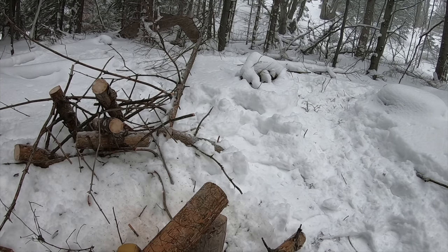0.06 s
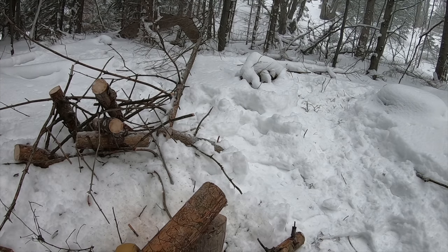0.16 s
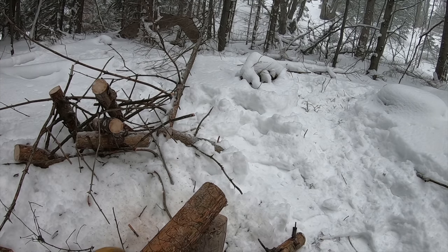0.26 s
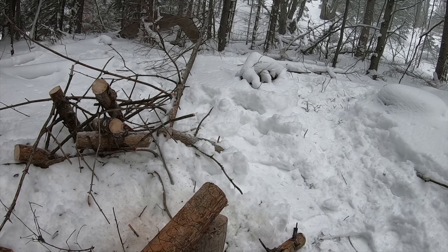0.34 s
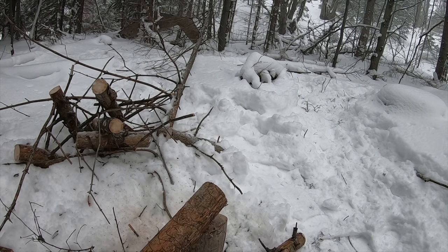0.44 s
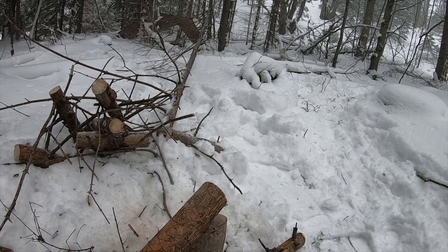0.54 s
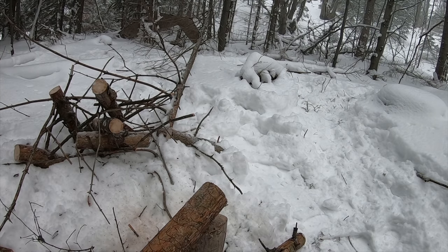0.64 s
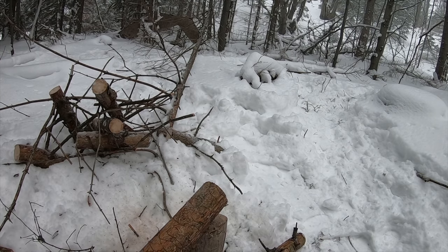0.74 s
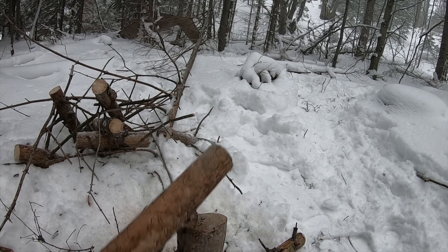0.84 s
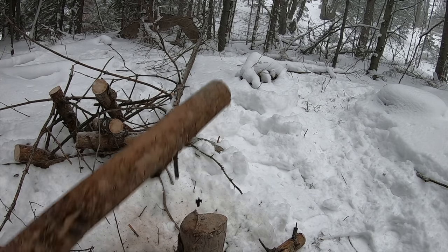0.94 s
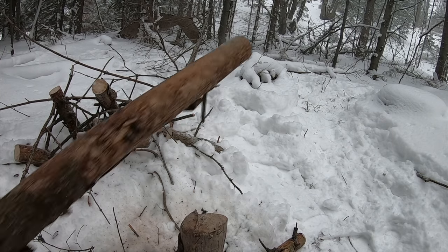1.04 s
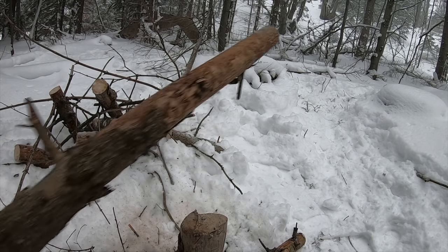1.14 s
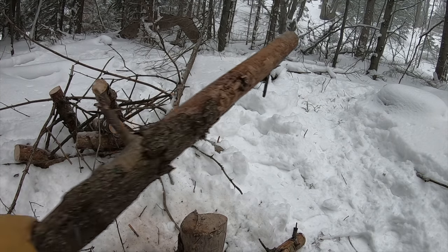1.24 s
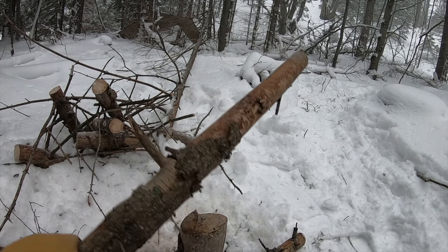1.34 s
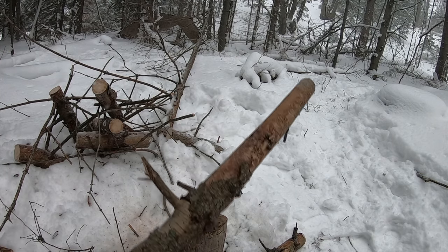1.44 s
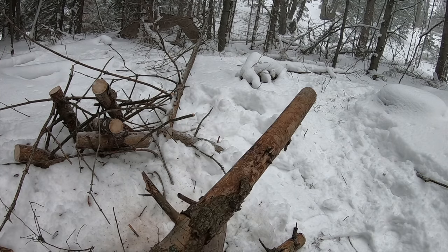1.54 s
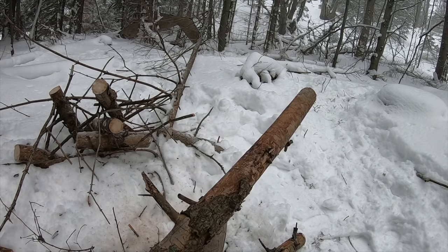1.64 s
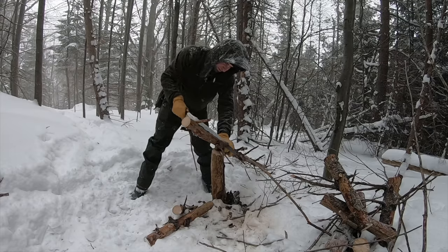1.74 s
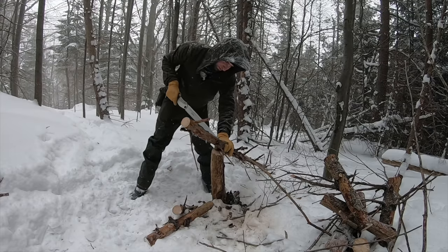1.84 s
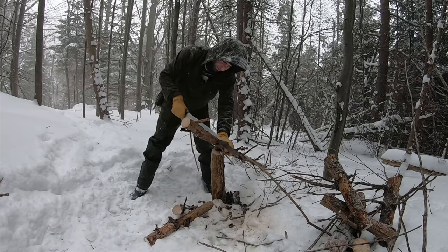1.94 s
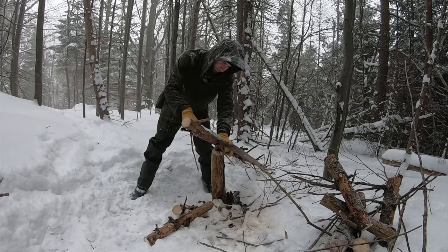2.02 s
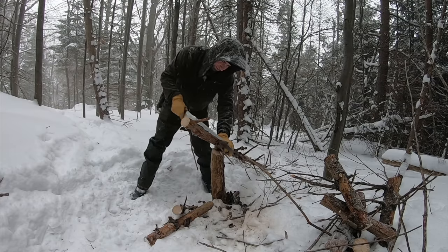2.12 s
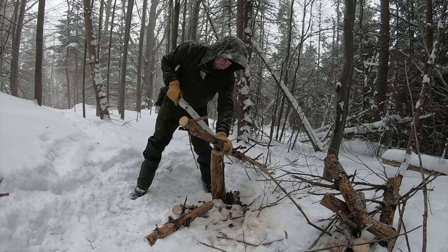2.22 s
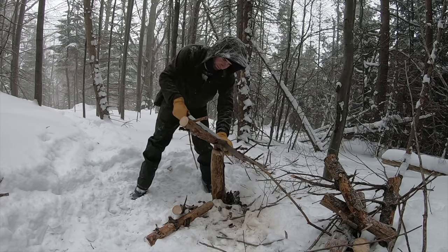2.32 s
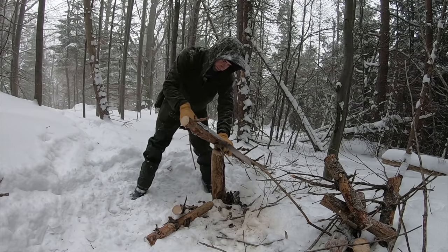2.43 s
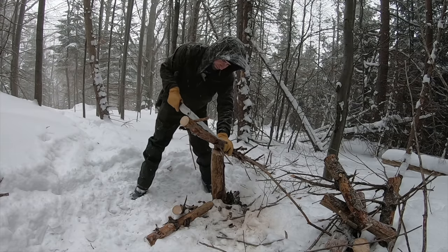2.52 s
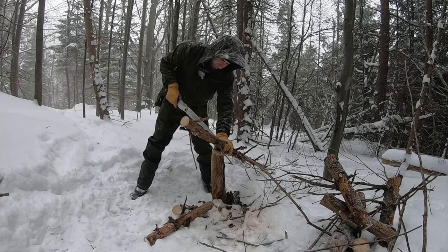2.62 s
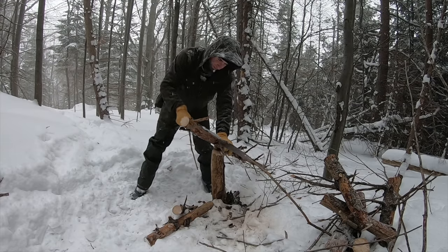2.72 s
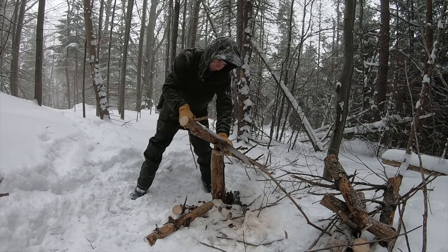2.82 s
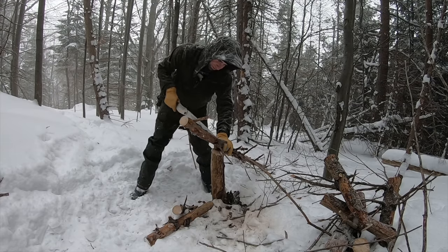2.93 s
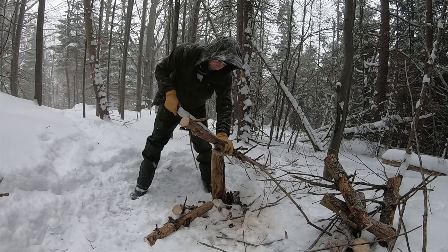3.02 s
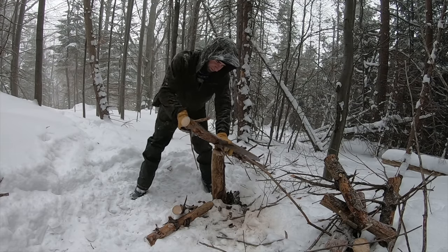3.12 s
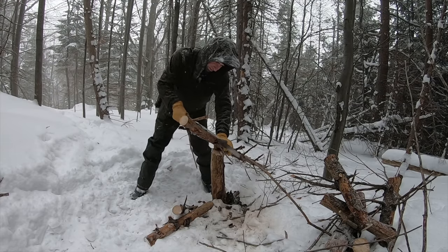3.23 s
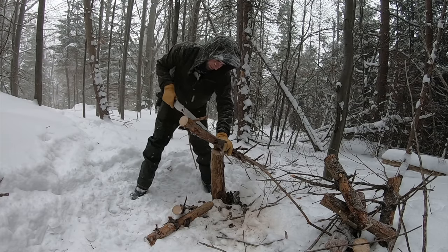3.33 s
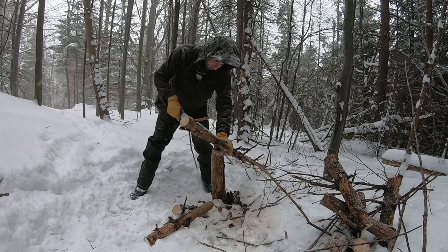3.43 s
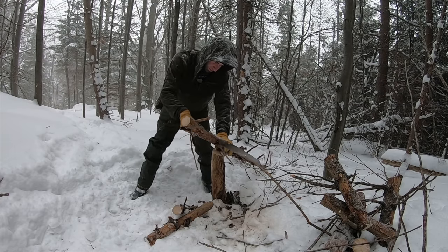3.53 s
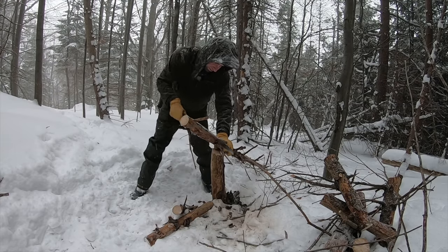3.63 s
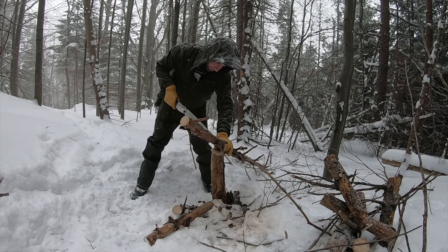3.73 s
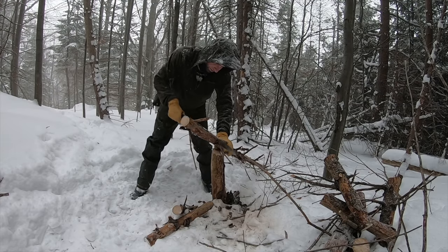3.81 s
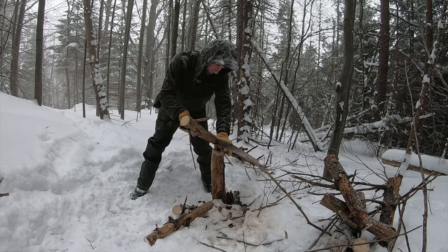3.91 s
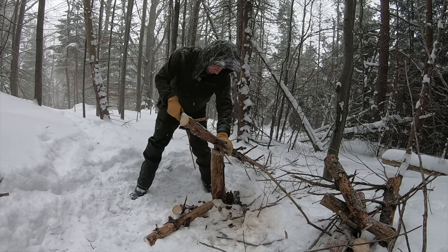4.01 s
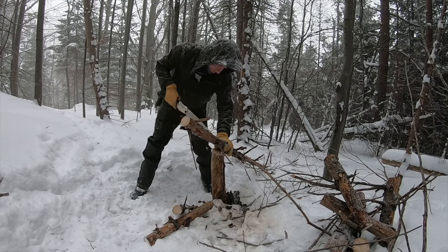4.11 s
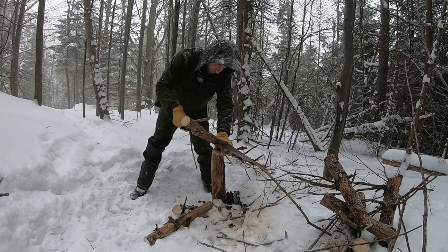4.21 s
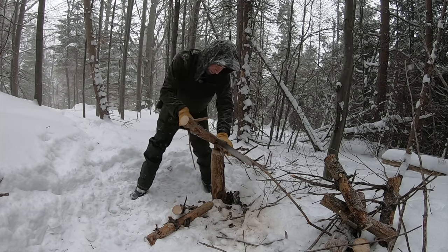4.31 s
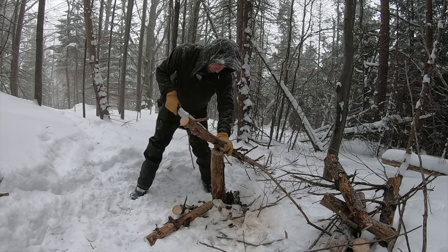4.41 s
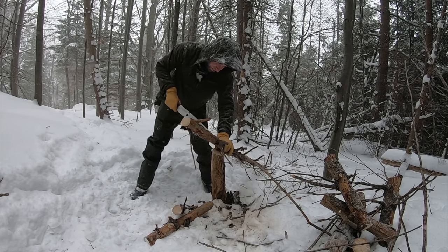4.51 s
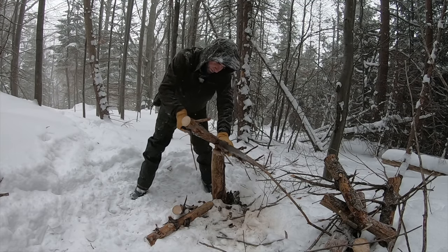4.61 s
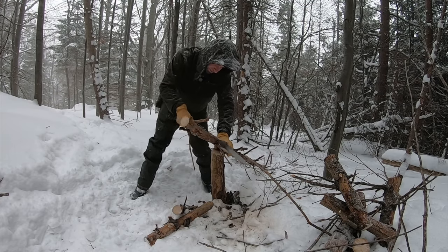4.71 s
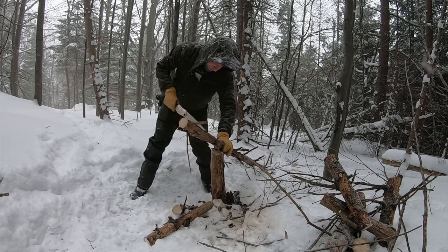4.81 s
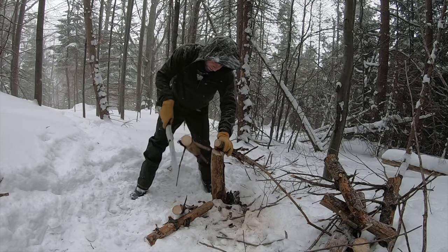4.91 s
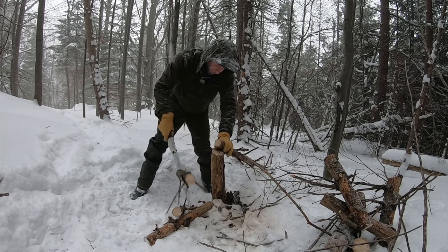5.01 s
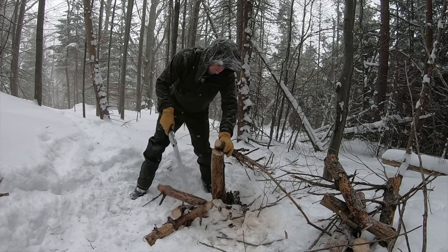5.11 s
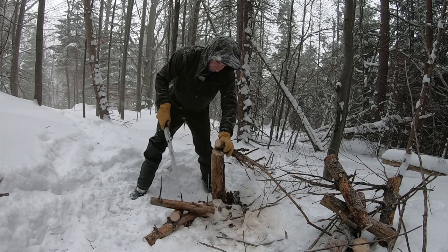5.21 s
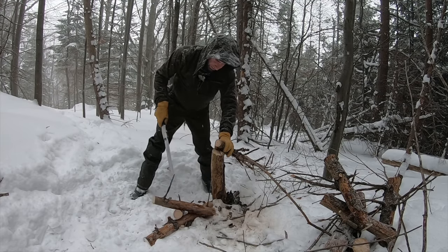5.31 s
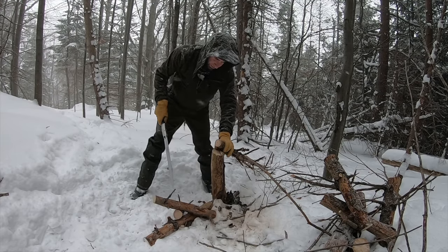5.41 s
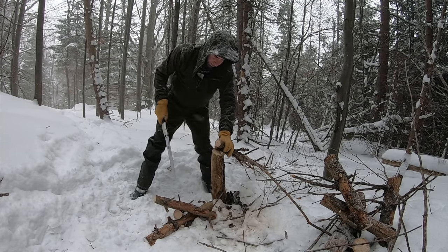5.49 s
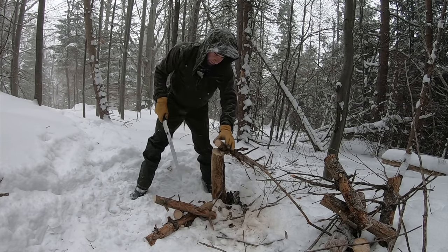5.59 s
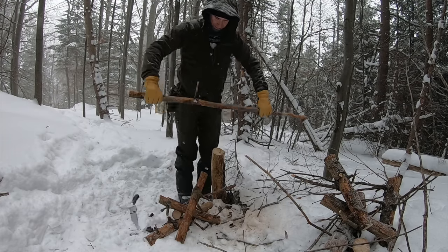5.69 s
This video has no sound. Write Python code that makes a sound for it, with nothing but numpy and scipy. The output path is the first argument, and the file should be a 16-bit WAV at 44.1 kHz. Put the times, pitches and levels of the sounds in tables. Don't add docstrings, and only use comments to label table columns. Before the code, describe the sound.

Muffled mount bumps and bark scrapes come first, with crisp twig snaps and a few hollow wood knocks as a branch is set down. Seventeen quick, regular saw strokes follow, bright and raspy over a woody body. The cut ends, steel rings faintly, and the offcut knocks onto the pile, leaving faint, nearly dry outdoor quiet. Close stereo pickup.

```python
import sys
import numpy as np
from scipy import signal
from scipy.fft import rfft, irfft, next_fast_len
from scipy.io import wavfile
from scipy.ndimage import uniform_filter1d, map_coordinates

SR = 44100
rng = np.random.default_rng(int(sys.argv[2]) if len(sys.argv) > 2 else 0)


def digitize_waveform(pressure):
    field = np.atleast_2d(pressure).T
    bounded = np.clip(field, -1, 1)
    quanta = np.round(bounded * 32767).astype(np.int16)
    wavfile.write(sys.argv[1], SR, quanta)


def convert_level_to_amplitude(level_db):
    exponent = np.asarray(level_db, float) / 20
    return 10 ** exponent


N = 253574
LIFT_S = 4.918

# f/Hz, density/dB per Hz
AIR_COLOUR = [(18, -13), (30, -24), (85, -26), (247, -4.5), (683, -5), (999, 5.5), (1660, -2), (7430, -16),
              (13000, -51)]
# f/Hz, t60/s
TRUNK_DECAY = [(200, 0.29), (2000, 0.11), (10000, 0.14)]
# f/Hz, left louder by/dB, left lag/rad, likeness/0-1
PORT_DIFFERENCE = [(60, -4, 0, .5), (220, 0, 0, .9), (800, 4, .7, .9), (1400, -1, .2, .92),
                   (2400, 0, 0, .985), (3900, 0, 0, 1), (5000, 9, -.1, .85), (6100, 12, .2, .65),
                   (7000, 7, 1, .72), (7900, 11, 1.2, .45), (8300, 2, 2.5, .6), (9500, -5, 1.5, .65),
                   (10500, -1, 0, .75), (12000, 0, 0, .62), (15000, -1, 0, .5)]

# crest t/s, level/dB, f/Hz, build-up per 20 dB/s
STAND_HUMS = [(1.59, -29, 106, .03), (1.76, -35, 111.2, 0.12), (1.915, -37, 106, .2), (2.03, -42, 113, .1),
              (2.16, -37, 114, 0.12), (2.295, -37.5, 110.3, 0.17), (2.45, -41, 116.1, .12),
              (2.6, -42, 112, .08), (2.675, -37, 108, 0.08), (2.85, -41, 118, 0.1), (2.96, -38, 104, .06),
              (3.05, -37.5, 108, 0.15), (3.24, -39, 114, .1), (3.35, -38, 100, .06),
              (3.42, -29.5, 102.9, 0.06), (3.63, -39, 115, .2), (3.73, -39, 100, .06),
              (3.795, -31, 105, 0.07), (3.965, -35, 115, 0.15), (4.04, -37, 115, .1), (4.13, -33, 102, .08),
              (4.19, -35, 96, .1), (4.335, -32.5, 114, 0.14), (4.41, -37, 113, 0.2),
              (4.555, -30, 103.9, .09), (4.74, -32.5, 112, 0.16), (4.885, -32.5, 108, 0.13),
              (4.95, -39, 114, .1), (5.19, -47, 114.2, 0), (5.316, -39, 113, 0.1)]
# crest t/s, rise per 20 dB/s, fall per 20 dB/s, deep level/dB, upper level/dB
HANDLING = [(.04, .03, .14, -54, -59), (.21, .02, 0.22, -55, -51), (.43, .2, .15, -57, -41.5),
            (.53, .06, .07, -58, -47.5), (.95, .6, .8, -78, -70.5), (1.08, .03, .1, -54, -69),
            (1.24, .02, .08, -60.5, -68), (1.57, .04, 0.23, -46.5, -68), (1.8, 0.081, 0.15, -53.5, -67),
            (2.88, .04, .08, -54.5, -62), (5.17, .03, .1, -57, -75), (5.33, .06, .09, -59, -68)]
# t/s, peak level/dB, f/Hz, click above it/dB
MOUNT_BUMPS = [(.024, -29.5, 109, -19), (.201, -22, 140, -14), (.254, -30.5, 178, -27),
               (.286, -24, 134.4, -24), (.321, -31.5, 178, -25), (.364, -28.5, 147.5, -27),
               (.415, -23, 138, -32), (.499, -30.5, 123, -17), (.913, -47, 189, 11), (1.06, -39, 283, -23),
               (1.074, -31.5, 131.6, -28), (1.227, -39, 80, 3), (1.539, -27.5, 170, -13),
               (1.557, -30.5, 128, -16)]

# crest t/s, rise per 20 dB/s, fall per 20 dB/s, level/dB
SLEEVE_SWEEPS = [
    (.45, .2, .3, -62),
    (1.25, .3, .12, -73),
]
# f/Hz, density/dB per Hz
SLEEVE_COLOUR = [(3000, -120), (4500, -12), (7000, -2), (9500, 0), (12800, -9), (14000, -30), (15500, -50)]
# crest t/s, rise per 20 dB/s, fall per 20 dB/s, hiss level/dB, low level/dB
DRAGS = [
    (.05, 0.12, .3, -72, -82),
    (.44, 0.2, 0.28, -50, -62),
    (.72, .04, 0.19, -66, -70),
    (.908, .13, 0.047, -46.5, -67),
    (1.01, .006, 0.13, -53, -53),
    (1.178, .3, 0.32, -54.5, -64),
    (1.53, 0.029, .15, -57.5, -72),
    (4.92, .02, .15, -52, -68.5),
    (5.144, 0.051, 0.099, -51, -59),
    (5.26, 0.021, 0.16, -52, -52),
]
# centre t/s, length/s, hiss level/dB, low level/dB
SOFT_SCUFFS = [(0.704, 0.046, -45.5, -55), (0.841, 0.019, -54, -62), (0.885, 0.06, -48, -58),
               (0.925, 0.05, -43, -48), (1.534, .025, -48, -60), (1.309, 0.1, -58, -66),
               (1.549, 0.066, -52, -43), (5.092, 0.031, -44, -52), (5.117, 0.045, -35.5, -45),
               (5.36, 0.04, -53.5, -63), (5.638, 0.075, -62.5, -62.5), (5.74, .07, -66, -83.5)]
# f/Hz, density/dB per Hz
CLOTH_COLOUR = [(590, -18), (1000, -6), (1720, -4.5), (2680, -3.5), (3040, -3), (3360, -3.5), (5050, -5.5),
                (6130, -9), (9320, -16), (15000, -50)]
# f/Hz, density/dB per Hz
BARK_COLOUR = [(50, -35), (130, -6.5), (550, -13.5), (817, -15.5), (906, -19.5), (1800, -26.5),
               (2340, -13.5), (3960, -120)]

# t/s, peak level/dB, f/Hz, crack above it/dB
WOOD_KNOCKS = [(.02, -45.5, 595, 9.5), (.197, -53, 861, -27), (.281, -50, 4200, -10),
               (.646, -43, 3500, -15), (.696, -34, 855, -15), (1.004, -33, 3000, 0),
               (1.058, -29.5, 495, -33.5), (1.175, -36, 1600, -10), (1.295, -40, 875, 15),
               (1.394, -58, 2380, -11), (1.551, -32, 1100, -38)]
# t/s, peak level/dB, f/Hz, crack above it/dB
TWIG_TICKS = [(.2485, -42, 4800, 0), (.2503, -31, 1100, -5), (.868, -27, 7700, 5), (.877, -29, 5000, 0),
              (.885, -34, 2100, 5), (.891, -33, 4300, 8), (.902, -36, 5000, 5), (.9086, -22, 5100, 5),
              (.915, -20, 4200, 8), (.926, -29, 1900, 9), (.930, -28, 1800, 9), (.9345, -19, 5000, -5),
              (.941, -27, 5000, -5), (.9595, -44, 6000, 8), (1.009, -38, 7000, 5), (1.027, -40, 2400, 5),
              (1.2305, -36, 900, 5), (1.311, -42, 2400, 8), (1.522, -36, 3800, 5), (1.528, -33, 3000, 8),
              (1.535, -29, 3900, 8), (5.282, -34, 5400, 0), (5.296, -36, 4000, 3), (5.352, -42, 5400, 3),
              (5.264, -34, 3200, 0)]
# f/Hz, level/dB, t60/s
BUTT_MODES = [(533, -6, .03), (834, 0, .022), (1150, 0, .02), (1600, -8, .015), (2385, -9, .02),
              (3122, -8, .02), (4710, -16, .015)]
# t/s, level/dB
BUTT_STRIKES = [
    (1.004, -21),
    (1.011, -30),
    (1.037, -33),
    (1.044, -39),
    (1.552, -31),
]
# f/Hz, level/dB, t60/s
STUB_MODES = [(1007, -12, .04), (1450, -6, .03), (1766, 0, .03), (2900, -16, .015), (3951, -18, .014)]
# t/s, level/dB
STUB_STRIKES = [
    (1.165, -44),
    (1.1755, -28),
    (1.181, -36),
]
# t/s, peak level/dB, f/Hz
TOOTH_CATCHES = [(1.6701, -53, 4780), (1.6886, -34, 4870), (1.709, -31, 2870), (1.7898, -21, 2760),
                 (1.9969, -21, 4400), (2.1455, -25, 3010), (2.3446, -29, 3300), (2.358, -24, 2970),
                 (2.5167, -26, 4650), (2.7152, -30, 2920), (2.7332, -23, 2860), (2.8993, -25, 6520),
                 (3.1033, -26, 4390), (3.2834, -23, 2710), (3.488, -25, 4460), (3.6536, -26, 3020),
                 (3.6745, -21, 2900), (3.8591, -28, 4600), (4.0342, -16, 4750), (4.0776, -16, 2870),
                 (4.2283, -29, 4270), (4.2418, -24, 2890), (4.3984, -26, 2850), (4.5915, -27, 2860),
                 (4.778, -25, 3360)]
# t/s, peak level/dB, f/Hz, crack above it/dB
FIBRE_SNAPS = [
    (2.06, -18, 3660, -5),
    (2.25, -19, 2960, -5),
    (2.435, -19.5, 3260, -7.5),
    (2.22, -22, 4500, 0),
    (2.18, -25, 3500, 0),
    (3.755, -20, 4470, 4),
    (4.046, -19, 4750, 0),
    (4.76, -32, 2880, 11.5),
    (4.888, -28, 4650, -10),
]
# f/Hz, level/dB, t60/s
STEEL_MODES = [(1238, -6, .15), (4420, -9, .18), (4947, 0, .24)]
# t/s, level/dB
BLADE_STRIKES = [
    (4.915, -54),
    (5.108, -33),
    (5.151, -47),
]
# f/Hz, level/dB, t60/s
OFFCUT_MODES = [(907, -8, .07), (1003, 0, .06), (1215, -10, .09), (2035, -23, .07), (2315, -26, .06),
                (2530, -24, .06), (2988, -6, .028), (3208, -23, .07), (3962, -17, .04), (4500, -14, .025),
                (4953, -25, .05), (7031, -27, .03)]
# t/s, level/dB
OFFCUT_LANDING = [
    (5.2441, -16),
    (5.283, -40),
]
# t/s, peak level/dB, f/Hz, crack above it/dB
OFFCUT_TUMBLE = [(5.085, -30, 3770, -10), (5.107, -23, 3820, -14.5), (5.118, -31, 5040, -16),
                 (5.15, -24, 929, 0), (5.282, -40, 2000, 0), (5.296, -39, 1000, 0), (5.346, -42, 3305, -14),
                 (5.43, -49.5, 927, -10), (5.46, -56, 970, 11), (5.499, -66, 810, 13),
                 (5.682, -59, 890, -23)]

# centre t/s, f/Hz, length/s, level/dB
TOOTH_SQUEALS = [(2.047, 1750, 0.096, -40.5), (2.97, 2950, 0.034, -36.5), (3.17, 5750, 0.02, -30),
                 (3.185, 1747, 0.046, -33), (3.727, 2900, 0.013, -25), (4.32, 642, 0.071, -40),
                 (4.298, 6750, 0.04, -33), (4.48, 2950, 0.022, -33.5), (4.665, 3750, 0.013, -31.5),
                 (4.835, 2906, 0.03, -23.5), (4.84, 1220, 0.066, -35)]
# start t/s, rasp level/dB, crest place/0-1, fall power
SAW_STROKES = [(1.7, -41, 0.3, 2.4), (1.762, -27.5, .45, 2.1), (1.948, -29.5, 0.67, 2.1),
               (2.126, -27, 0.61, 3.5), (2.321, -30.5, 0.6, 2.6), (2.498, -27.5, 0.56, 3.05),
               (2.699, -29.5, .65, 2.4), (2.876, -26.5, .54, 3), (3.078, -31, 0.58, 1.9),
               (3.252, -26.5, .58, 3.2), (3.447, -31, .66, 2.06), (3.628, -27, .66, 4.6),
               (3.827, -33, 0.64, 1.8), (4.003, -28, 0.49, 1.74), (4.193, -33, 0.55, 1.4),
               (4.376, -28.5, 0.5, 1.7), (4.574, -34, 0.55, 1.6), (4.753, -29.5, 0.54, 0.57)]
# centre t/s, level/dB
DEEP_BITES = [(1.828, 2), (1.853, 2), (2.065, 4), (2.19, 2), (2.259, 3), (2.436, 4), (2.572, 2), (2.605, 2),
              (2.813, 3), (2.972, 2), (3.172, 2), (3.343, 2), (3.376, 3), (3.517, 2), (3.556, 2),
              (3.727, 2), (3.756, 3), (3.943, 2), (4.081, 3), (4.12, 2), (4.292, 2), (4.49, 2), (4.679, 2),
              (4.835, 4), (4.891, 2)]
# f/Hz, density/dB per Hz
RASP_COLOUR = [(880, -26.5), (1500, -8.5), (1770, -20), (1970, -17), (2890, -1.5), (3280, -3.5),
               (4360, -3.5), (6510, -4), (8400, -15), (9630, -13), (11400, -26.5), (14100, -31),
               (15600, -43)]
# f/Hz, density/dB per Hz
WOOD_COLOUR = [(94, -31.5), (160, 3), (222, -4), (434, -8), (630, -2.5), (760, -5.5), (1240, -1),
               (1960, -4.5), (2400, -7), (3120, -17), (5280, -120)]
# f/Hz, width/Hz, level/dB, growth/dB per s
BLADE_MODES = [(2280, 200, 2, 0), (2890, 170, -2.5, 2.5), (3500, 78, -9, 0), (4400, 100, -3, 0),
               (4720, 96, -8, 1), (5700, 64, -7, 0), (6720, 50, -8, 2), (9400, 200, -8, 0)]
# f/Hz, width/Hz, level/dB, growth/dB per s
FREE_BLADE_MODES = [(1230, 14, -9, 0), (2880, 12, -8, 0), (4430, 12, -9, 0), (4950, 10, -4, 0)]
# f/Hz, width/Hz, level/dB, growth/dB per s
BRANCH_MODES = [(633, 50, -3, 2), (1000, 30, -9, 0), (1220, 90, -6, 1), (1490, 50, -5, 1),
                (1740, 70, -6, -1.5)]


def unit(x):
    return x / np.sqrt(np.mean(x ** 2) + 1e-20)


def along(points, hz):
    f, *columns = np.transpose(points)
    return np.squeeze([np.interp(np.log(hz + 1), np.log(f + 1), column) for column in columns])


def coloured(x, points):
    return filtered(x, lambda f: convert_level_to_amplitude(along(points, f)))


def filtered(x, response):
    m = next_fast_len(N + SR // 2)
    return irfft(rfft(x, m) * response(np.fft.rfftfreq(m, 1 / SR)), m)[..., :N]


def wobble(rate):
    knots = rng.standard_normal(int(N * rate / SR) + 400)
    return map_coordinates(knots, [np.arange(N) * rate / SR])


def patches(shape, rows, frames):
    field = uniform_filter1d(rng.standard_normal(shape), size=rows, axis=0)
    return unit(uniform_filter1d(field, size=frames, axis=1))


def grains(spike_db, patchy_db, drift_db=-2.0):
    size_db = spike_db * np.minimum(rng.exponential(size=N), 5)
    z = signal.stft(rng.standard_normal(N) * convert_level_to_amplitude(size_db), nperseg=256)[2]
    field = patchy_db * patches(z.shape, 3, 3) + drift_db * patches(z.shape, 2, 30)
    return unit(signal.istft(z * convert_level_to_amplitude(field), nperseg=256)[1][:N])


def add(out, s, sound):
    out[round(s * SR):][:len(sound)] += sound[:N - round(s * SR)]


def swell(centre, length):
    out = np.zeros(N)
    u = np.arange(round(length * SR)) / (length * SR)
    add(out, centre - length / 2, np.sin(np.pi * u) ** 2)
    return out


def humps(rows):
    s, rise, fall = np.transpose(rows)[:3, :, None]
    late = np.arange(N) / SR - s
    fallen = np.where(late < 0, -late / rise, late / fall)
    return uniform_filter1d(convert_level_to_amplitude(-20 * fallen), size=300, axis=1)


def ring(t, hz, t60, attack):
    return np.sin(2 * np.pi * hz * t) * convert_level_to_amplitude(-60 * t / t60) * (1 - np.exp(-t / attack))


def resonances(modes, f):
    return 1 + sum(convert_level_to_amplitude(db) * 1j * f * w / (c * c - f * f + 1j * f * w) for c, w, db, _ in modes)


def singing(drive, modes, colour):
    t, knots = np.arange(N) / SR, rng.standard_normal((len(modes), 200))
    hz, w, db, grows = np.transpose(modes)[:, :, None]
    # 3 dB, 10 knots per second
    wander = np.array([np.interp(t * 10, np.arange(200), row) for row in knots])
    gain = convert_level_to_amplitude(db + grows * (t - t.mean()) + 3 * wander)
    rings = filtered(gain * drive, lambda f: 1j * f * w / (hz * hz - f * f + 1j * f * w)).sum(axis=0)
    return coloured(drive + rings, colour)


def stroke_motion():
    t, start = np.arange(N) / SR, np.array([row[0] for row in SAW_STROKES])
    k = np.clip(np.searchsorted(start, t) - 1, 0, len(start) - 1)
    _, rasp_db, crest, fall_power = np.array(SAW_STROKES)[k].T
    end = np.append(start[1:], LIFT_S)
    u = np.clip((t - start[k]) / (end[k] - start[k]), 0, 1)
    speed = np.sin(np.pi / 2 * np.where(u < crest, u / crest, (1 - u) / (1 - crest)))
    rise_power = np.where(k % 2, 1.69, 1.47)
    power = np.where(u < crest, rise_power, fall_power)
    wood_db = -39 + 0.83 * (start[k] - start[0]) + 0.47 * (rasp_db - np.median(rasp_db)) - rasp_db
    return speed, power, rasp_db, wood_db


def forest():
    noise = rng.standard_normal((2, N))
    air = filtered(noise, lambda f: convert_level_to_amplitude(along(AIR_COLOUR, f)) * f ** 2 / (f ** 2 + 130 ** 2))
    return convert_level_to_amplitude(-67 + 0.5 * wobble(4.38)) * unit(air)


def trees(x):
    hz, t, z = signal.stft(rng.standard_normal(SR // 2), SR, nperseg=256)
    decay = convert_level_to_amplitude(-60 * t / along(TRUNK_DECAY, hz)[:, None])
    tail = signal.istft(z * decay, SR, nperseg=256)[1]
    return signal.fftconvolve(x, tail / np.linalg.norm(tail))[:N]


def ports(x):
    z = signal.stft(x, nperseg=128)[2]
    random_phase = np.exp(2j * np.pi * rng.random(z.shape))
    other = signal.istft(z * random_phase, nperseg=128)[1][:N]
    other = other * np.std(x) / np.std(other)

    def gains(f):
        db, lag, alike = along(PORT_DIFFERENCE, f)
        right = convert_level_to_amplitude(-db) * np.exp(1j * lag)
        shared = alike * right
        own = np.sqrt(abs(1 - alike ** 2)) * right
        return np.array([np.ones_like(f), shared, own]) * 2 / np.hypot(abs(1 + shared), abs(own))

    left, right, _ = filtered(x, gains)
    return np.array([left, right + filtered(other, gains)[2]])


def bumps():
    out, t = np.zeros(N), np.arange(SR // 2) / SR
    for s, db, hz, click_db in MOUNT_BUMPS:
        falling_hz = hz * (1 + 0.67 * np.exp(-t / 0.0035))
        thud = ring(t, falling_hz, t60=0.14, attack=0.0014)
        click = ring(t, 840, t60=0.0085, attack=0.0014)
        add(out, s, convert_level_to_amplitude(db + 4.5) * (thud + convert_level_to_amplitude(click_db) * click))
    left = filtered(out, lambda f: 1j * f / (260 + 1j * f))
    return np.array([left, 1.85 * out])


def stand_hum():
    crest_gain = np.array([convert_level_to_amplitude(db) for _, db, _, _ in STAND_HUMS])[:, None]
    swells = crest_gain * humps([(s, rise, 0.0944) for s, _, _, rise in STAND_HUMS])
    level = swells.max(axis=0)
    hum_hz = uniform_filter1d(np.array(STAND_HUMS)[swells.argmax(axis=0), 2], size=2000)
    phase = 2 * np.pi * np.cumsum(hum_hz + 6 * wobble(25)) / SR
    port_phase = np.array([0.74 + 2.56 * wobble(9), 0 * level])
    hum = level * convert_level_to_amplitude(4.3 + 1.8 * wobble(20)) * np.sin(phase + port_phase)
    return hum * convert_level_to_amplitude([[-7], [4]])


def handling():
    jolts, (deep_db, upper_db) = humps(HANDLING), np.transpose(HANDLING)[3:]
    sawing = uniform_filter1d((stroke_motion()[0] > 0) * 1., size=4000)
    deep_gain = convert_level_to_amplitude(deep_db) @ jolts + convert_level_to_amplitude(-66) * sawing + convert_level_to_amplitude(-97)
    upper_gain = convert_level_to_amplitude(upper_db) @ jolts + convert_level_to_amplitude(-63.5) * sawing + convert_level_to_amplitude(-74)
    noise = rng.standard_normal((4, N))
    deep_noise = noise[0] + 0.42 * noise[:2]
    deep = unit(filtered(deep_noise, lambda f: (f / 55) ** 3.23 / (1 + (f / 70) ** 6)))
    upper = unit(filtered(noise[2:], lambda f: (f / 200) ** 3 / (1 + (f / 260) ** 6)))
    deep = deep_gain * convert_level_to_amplitude(10.5 + 3.2 * wobble(14)) * deep
    return deep + upper_gain * convert_level_to_amplitude(2.5 + 6.1 * wobble(30)) * upper


def sleeve():
    hiss = unit(coloured(grains(spike_db=0.5, patchy_db=2.0), SLEEVE_COLOUR))
    return convert_level_to_amplitude(np.transpose(SLEEVE_SWEEPS)[3]) @ humps(SLEEVE_SWEEPS) * hiss


def rustle():
    drags, (hiss_db, low_db) = humps(DRAGS), np.transpose(DRAGS)[3:]
    clumps = convert_level_to_amplitude(1.5 * wobble(90))
    hiss = unit(coloured(grains(spike_db=3.5, patchy_db=2.0), CLOTH_COLOUR))
    low = unit(coloured(grains(spike_db=5.5, patchy_db=2.0), BARK_COLOUR))
    scuff_hiss = sum(convert_level_to_amplitude(db) * swell(s, length) for s, length, db, _ in SOFT_SCUFFS)
    scuff_low = sum(convert_level_to_amplitude(db) * swell(s, length) for s, length, _, db in SOFT_SCUFFS)
    hiss_gain = convert_level_to_amplitude(-80) + convert_level_to_amplitude(hiss_db - 0.5) @ drags + scuff_hiss
    low_gain = convert_level_to_amplitude(-78.5) + convert_level_to_amplitude(low_db + 6.5) @ drags + scuff_low
    return clumps * (hiss_gain * hiss + low_gain * low)


def contact(hz, crack_db, t60):
    t = np.arange(SR // 4) / SR
    burst = rng.standard_normal((2, len(t))) * convert_level_to_amplitude(-60 * t / t60) * (1 - np.exp(-t / 0.00027))
    burst[:, 4] += 4
    body = 0
    for ratio, gain in [(0.5, 0.48), (1, 1), (2.1, 0.14)]:
        body = body + gain * signal.lfilter(*signal.iirpeak(ratio * hz, 4.5, SR), burst[0])
    body = signal.lfilter(*signal.butter(3, min(3.7 * hz, 7500), fs=SR), body)
    crack = signal.lfilter(*signal.butter(4, [1800, 8500], "bandpass", fs=SR), burst[1])
    return body / abs(body).max() + convert_level_to_amplitude(crack_db - 13) * crack / abs(crack).max()


def knocks():
    out = np.zeros(N)
    catches = [(s, db - 9, hz, 8) for s, db, hz in TOOTH_CATCHES]
    kinds = [(WOOD_KNOCKS, 0.038), (FIBRE_SNAPS, 0.03), (OFFCUT_TUMBLE, 0.034),
             (TWIG_TICKS, 0.014), (catches, 0.025)]
    for rows, t60 in kinds:
        for s, db, hz, crack_db in rows:
            add(out, s, convert_level_to_amplitude(db) * contact(hz, crack_db, t60))
    return out


def struck_bodies():
    out, t = np.zeros(N), np.arange(SR // 4) / SR
    bodies = [(BLADE_STRIKES, STEEL_MODES), (OFFCUT_LANDING, OFFCUT_MODES),
              (BUTT_STRIKES, BUTT_MODES), (STUB_STRIKES, STUB_MODES)]
    for hits, modes in bodies:
        for s, db in hits:
            add(out, s, sum(convert_level_to_amplitude(db + level) * ring(t, hz, min(t60, 0.4), 0.0006) for hz, level, t60 in modes))
    s, db = OFFCUT_LANDING[0]
    band = signal.butter(3, [550, 4800], "bandpass", fs=SR)
    crunch = signal.lfilter(*band, rng.standard_normal(len(t)))
    add(out, s, convert_level_to_amplitude(db - 6 - 60 * t / 0.065) * crunch)
    return out


def squeals():
    t, out = np.arange(N) / SR, np.zeros(N)
    for s, hz, length, db in TOOTH_SQUEALS:
        tone = np.sin(2 * np.pi * hz * t + 1.37 * wobble(150))
        out += convert_level_to_amplitude(db + 5.8 * wobble(140)) * swell(s, length) * tone
    return out


def saw():
    speed, power, rasp_db, wood_db = stroke_motion()
    tooth_hz = 235 * speed * (1 + 0.05 * wobble(30))
    tooth_phase = 2 * np.pi * np.cumsum(tooth_hz) / SR
    teeth = 1 + 0.05 * np.cos(tooth_phase)
    push = convert_level_to_amplitude(1.6 * (rasp_db + 27) - 50 + 3 * wobble(25)) * speed ** 2 * np.sin(tooth_phase)
    drag = uniform_filter1d((speed > 0) * convert_level_to_amplitude(-27.5), size=600)
    deeper_db = 0.55 * sum(db * swell(s, 0.035) for s, db in DEEP_BITES)
    bite = teeth * convert_level_to_amplitude(rasp_db - 0.6 + deeper_db + 0.7 * wobble(60) + 0.4 * wobble(280))

    tear = grains(spike_db=1.2, patchy_db=1.9, drift_db=1.6)
    gnaw = grains(spike_db=2.5, patchy_db=2.0, drift_db=2.7)
    blade_modes = BLADE_MODES + FREE_BLADE_MODES
    steel = singing(bite * (speed ** power + drag) * tear, blade_modes, RASP_COLOUR)
    wood_drive = bite * convert_level_to_amplitude(wood_db) * (speed ** (0.58 * power) + 2.2 * drag) * gnaw
    wood = singing(wood_drive, BRANCH_MODES, WOOD_COLOUR)
    steel_ref = np.std(filtered(tear, lambda f: convert_level_to_amplitude(along(RASP_COLOUR, f)) * resonances(blade_modes, f)))
    wood_ref = np.std(filtered(gnaw, lambda f: convert_level_to_amplitude(along(WOOD_COLOUR, f)) * resonances(BRANCH_MODES, f)))
    return convert_level_to_amplitude(-0.09) * steel / steel_ref + convert_level_to_amplitude(-0.35) * wood / wood_ref + push


def scene():
    near = sleeve() + rustle() + knocks() + struck_bodies() + squeals() + saw()
    mount = bumps() + stand_hum() + handling()
    return forest() + mount + ports(near + convert_level_to_amplitude(-16.5) * trees(near))


def band_limit(x):
    return signal.sosfilt(signal.butter(12, 15690, fs=SR, output="sos"), x)


def record(dry):
    mix = filtered(dry, lambda f: f < 15690)
    return band_limit(mix)


dry = scene()
out = record(dry)
digitize_waveform(out)
```